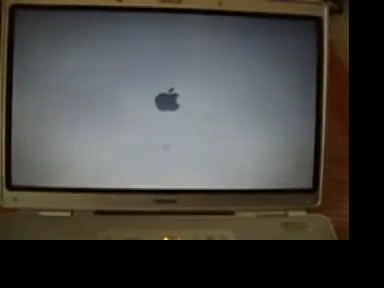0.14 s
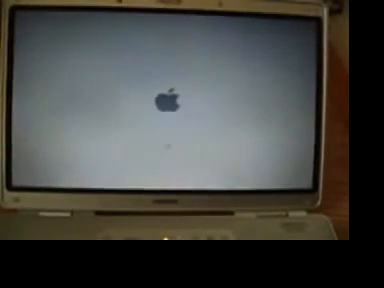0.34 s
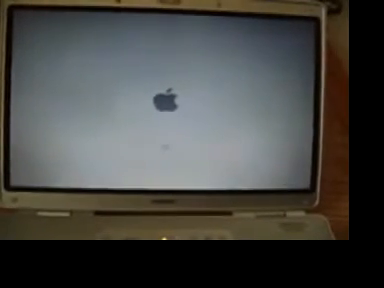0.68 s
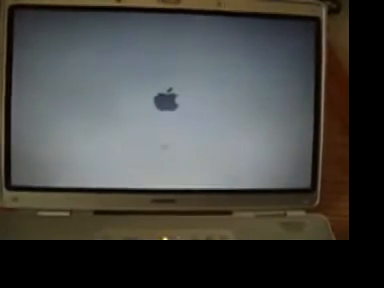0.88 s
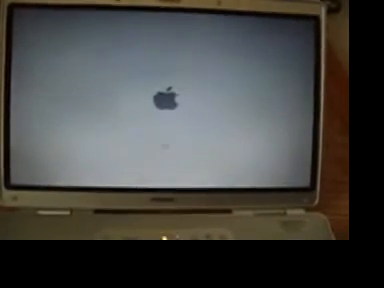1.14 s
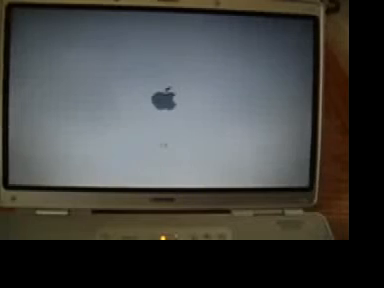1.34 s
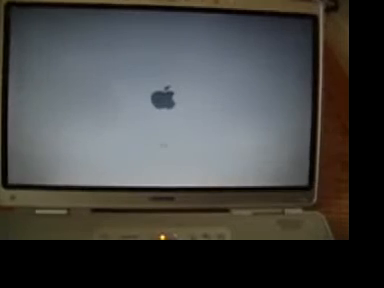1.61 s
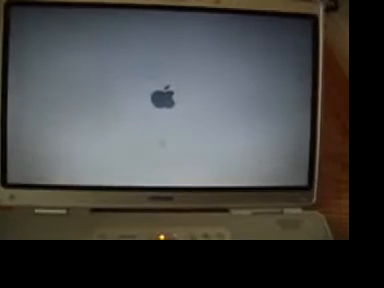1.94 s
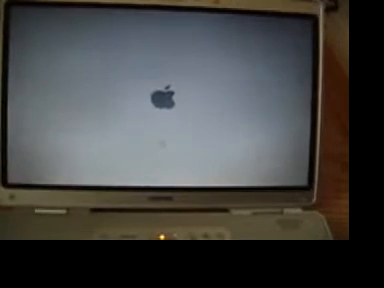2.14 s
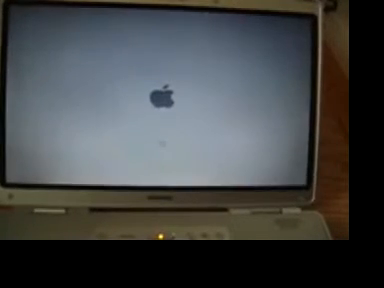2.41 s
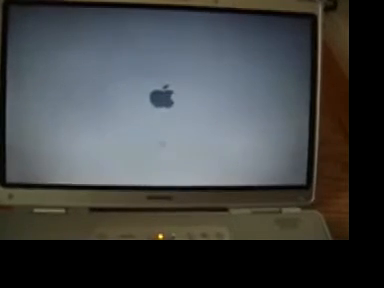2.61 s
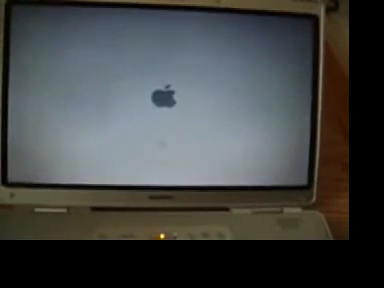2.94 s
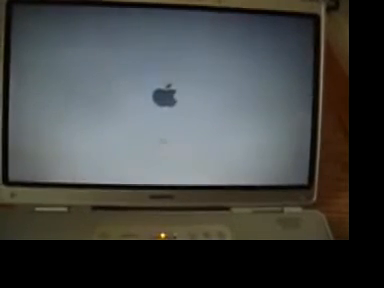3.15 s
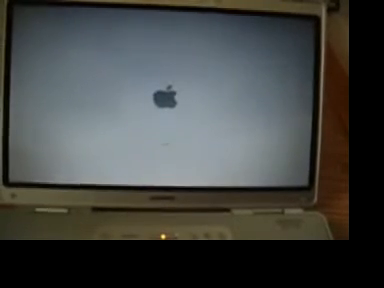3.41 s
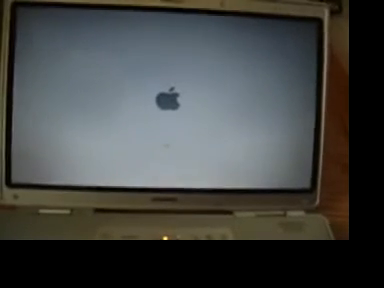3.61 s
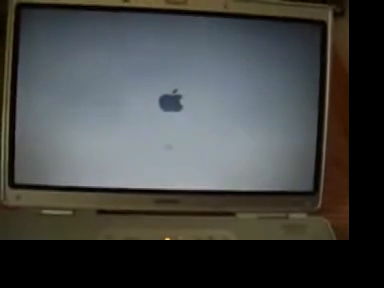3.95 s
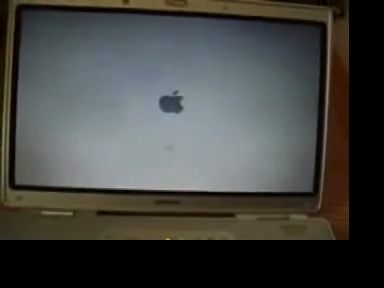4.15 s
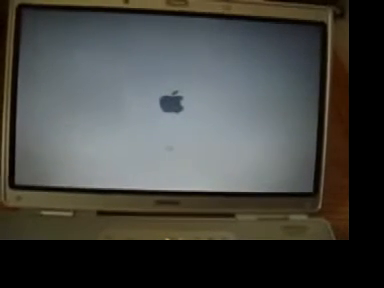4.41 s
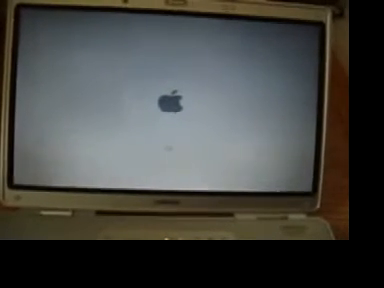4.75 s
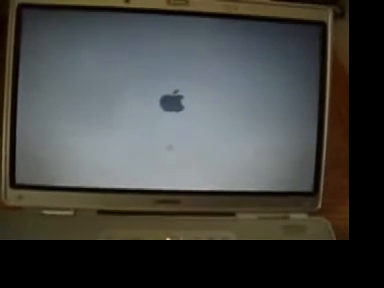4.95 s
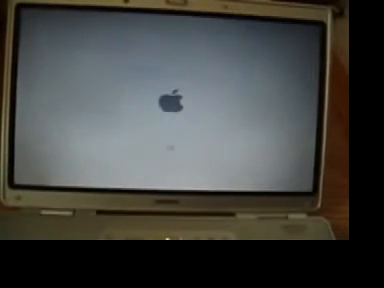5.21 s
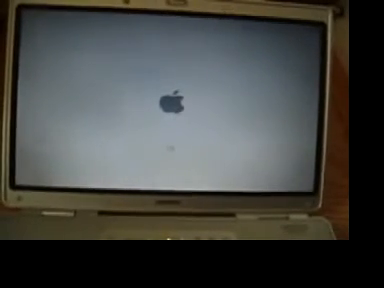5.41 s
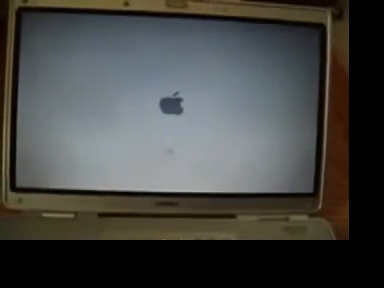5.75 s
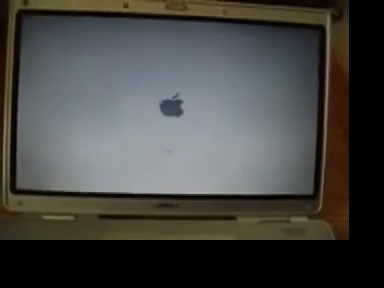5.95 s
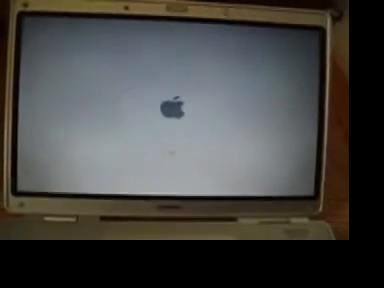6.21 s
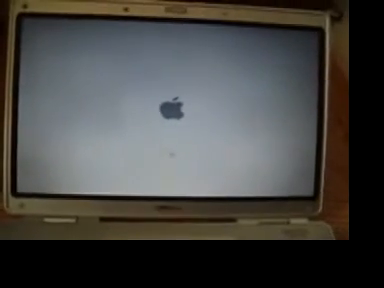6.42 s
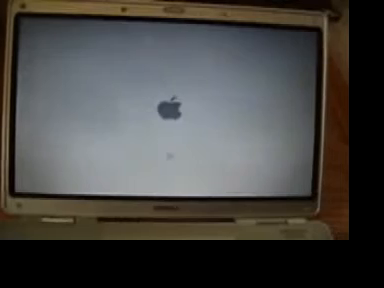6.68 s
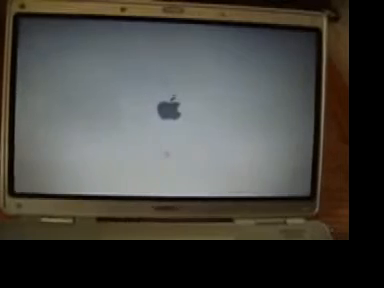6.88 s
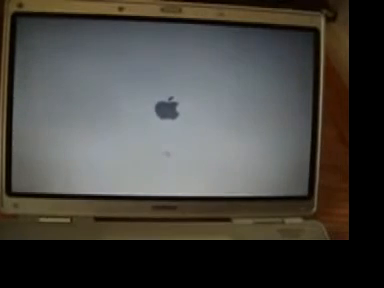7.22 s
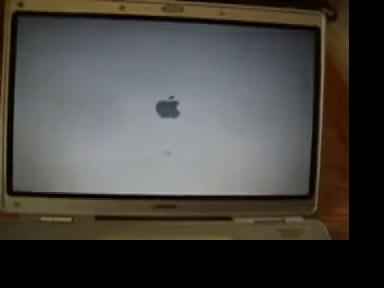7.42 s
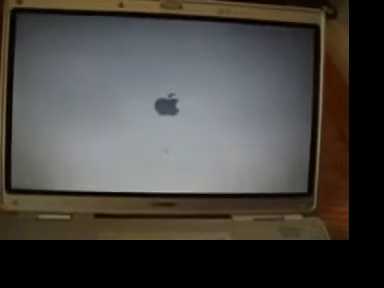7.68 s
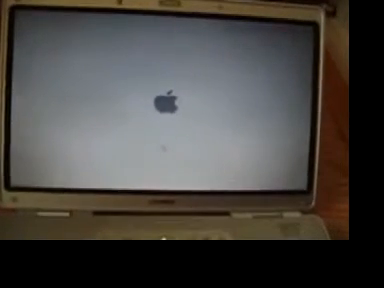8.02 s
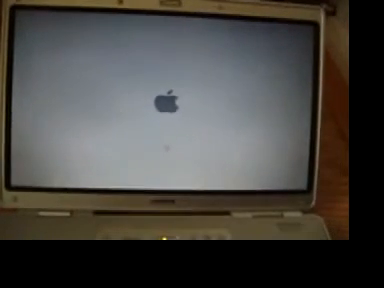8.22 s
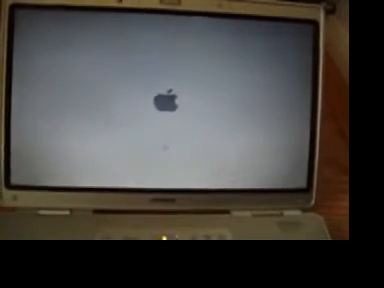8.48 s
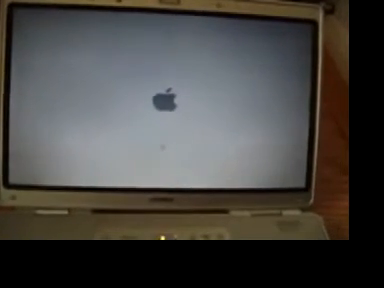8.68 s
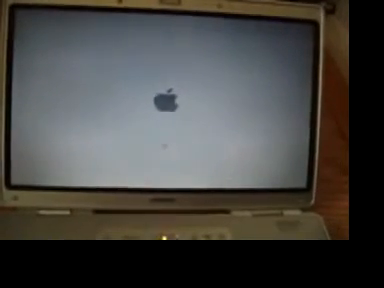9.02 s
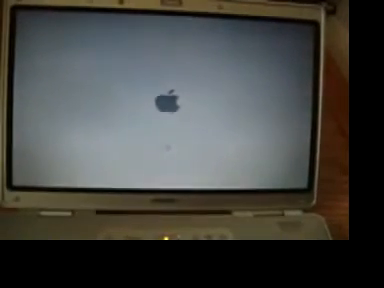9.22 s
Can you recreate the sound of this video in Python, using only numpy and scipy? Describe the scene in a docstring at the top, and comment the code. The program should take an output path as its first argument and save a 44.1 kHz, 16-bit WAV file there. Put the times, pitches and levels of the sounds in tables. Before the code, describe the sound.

Continuous cooling-fan drone, heard close and in mono through a dull, narrow-band microphone with faint hiss. A constant whine around seven hundred hertz dominates a soft airy rush, with low hum and very thin high electric whistles beneath. Apart from a slight early run-up of the smaller fan, nothing changes. Quiet desk bumps appear around five and six and a half seconds, then deep faint thuds and final light plastic ticks.

```python
"""A quiet room: an open laptop idles on a desk, close to the microphone of a small hand-held camera. Two
cooling fans whir as sums of sines locked to their shafts, over a rush of shaped noise. Fixed sines give the
hum, thin electric whistles and two high tones of the small fan held at a steady pitch; low ringing sines give
faint thuds and knocks from the building and desk, and one brief rumble. A few filtered noise ticks come near
the end."""
import sys
import numpy as np
from scipy import signal
from scipy.fft import rfft, irfft
from scipy.io import wavfile
from scipy.ndimage import uniform_filter1d

SR = 44100
rng = np.random.default_rng(int(sys.argv[2]) if len(sys.argv) > 2 else 0)


def log_audio(samples):
    """Write samples as a 16-bit WAV file to the path given in sys.argv[1]."""
    # one column per channel
    frames = np.atleast_2d(samples).T
    # limit to full scale, then quantise
    limited = np.clip(frames, -1, 1)
    pcm = np.round(limited * 32767).astype(np.int16)
    wavfile.write(sys.argv[1], SR, pcm)


N = 412335  # length in samples, about 9.35 s


def gain_of(db):
    """Amplitude factor of a level in dB."""
    return 10 ** (np.asarray(db) / 20)


def evened(x):
    """Scale to an rms of one."""
    return x / np.sqrt(np.mean(x ** 2) + 1e-20)


def add(mix, start_s, sound):
    """Lay a sound into the mix, cut where the mix ends."""
    part = mix[round(start_s * SR):][:len(sound)]
    part += sound[:len(part)]


def wander(fastest_hz, count=24):
    """Slow chance of rms one: sines of random phase, weaker as they get faster."""
    t = np.arange(0, N + 400, 200) / SR  # a coarse grid is enough for such slow motion
    slow = 0
    for hz in np.geomspace(.06, fastest_hz, count):
        slow = slow + np.sin(2 * np.pi * (hz * t + rng.random())) / np.sqrt(hz)
    return np.interp(np.arange(N) / SR, t, evened(slow))


# Rushing air and room rumble, before the fine ripples: (pitch_hz, level_db per Hz)
AIR_COLOUR = [(14, -76), (45, -83.5), (75, -70.5), (140, -73), (220, -69.5), (420, -69), (520, -62),
              (780, -59), (900, -64.5), (1130, -65), (1200, -71.5), (2300, -74.5), (3800, -77), (4800, -81)]
# Fine ripples in the colour of the rush, some of them only chance:
# (pitch_hz, width_hz as two standard deviations, lift_db)
RIPPLES = [(208, 18, 2), (278, 15, 1), (417, 25, -1.5), (528.4, 25, 3.5), (542, 9.4, -5), (560, 20, -2.5),
           (808, 27, -1), (938, 9.1, 4.5), (1180, 28, -1.5), (1190, 20, 4), (1380, 24, 2.5), (1464, 20, -2),
           (1470, 25, 2.5), (1500, 30, -1.5), (1600, 40, -1.5), (1665, 40, 2.5), (1665, 27, -1.5),
           (1830, 19, -1), (1983, 36, -3.5), (2220, 110, 1.5), (2470, 91, -2), (3010, 60, -2.5),
           (3070, 77, 3), (3240, 54, -1), (3800, 150, 0.5), (4000, 160, -2), (4700, 82, 2.5)]


def air(patchy_db=.5, swell_db=0.41):
    """Random short-time spectra with a rippled colour, faint drifting patches and a slow swell."""
    size, hop = 4096, 1024
    frames, hz = N // hop + 5, np.fft.rfftfreq(size, 1 / SR)
    real, imaginary, patches = rng.standard_normal((frames, len(hz), 3)).T
    patches = uniform_filter1d(patches, size=40, axis=0)  # along pitch
    patches = evened(uniform_filter1d(patches, size=4, axis=1))  # along time

    colour_hz, level_db = np.transpose(AIR_COLOUR)
    colour_db = np.interp(np.log(hz + 1), np.log(colour_hz), level_db)
    for centre_hz, width_hz, lift_db in RIPPLES:
        colour_db = colour_db + lift_db * np.exp(-2 * ((hz - centre_hz) / width_hz) ** 2)

    swell = np.resize(wander(3.4)[::hop], frames)
    white = (real + 1j * imaginary) * gain_of(patchy_db * patches + swell_db * swell)
    overlap = size - hop
    white_rms = signal.istft(white, nperseg=size, noverlap=overlap)[1].std()
    scale = np.sqrt(SR / 2) / white_rms  # makes white noise 0 dB per Hz
    rush = signal.istft(white * gain_of(colour_db)[:, None], nperseg=size, noverlap=overlap)[1]
    return scale * rush[:N]


def low_note(pitch_hz, level_db, rise_s, t60_s):
    """Swells softly to its peak level and rings down on one pitch, for one second at most."""
    t = np.arange(SR) / SR
    swell = np.sin(np.pi / 2 * np.minimum(t / rise_s, 1)) ** 2
    ring = gain_of(level_db - 60 * np.maximum(t - rise_s, 0) / t60_s)
    return swell * ring * np.sin(2 * np.pi * pitch_hz * t)


def rumble():
    """One brief low rumble passes: a single slow-rising low note."""
    out = np.zeros(N)
    add(out, 3.4, low_note(pitch_hz=31, level_db=-46, rise_s=.14, t60_s=.5))
    return out


# Heavy thuds somewhere in the building: (start_s, level_db as the peak of a 0 dB floor mode)
THUD_TIMES = [(6.37, -46), (7.79, -46), (8.48, -44.5)]
# What the floor rings with: (pitch_hz, level_db relative to the thud, t60_s)
FLOOR_RINGS = [(18, 0, 1.9), (30, -2, .7)]


def thuds():
    """Each distant thud rings all the floor modes together."""
    out = np.zeros(N)
    for start_s, level_db in THUD_TIMES:
        for pitch_hz, mode_db, t60_s in FLOOR_RINGS:
            add(out, start_s, low_note(pitch_hz, level_db + mode_db, .045, t60_s))
    return out


# Dull knocks through the desk: (start_s, pitch_hz, level_db at the peak)
DESK_KNOCKS = [(4.82, 105, -41), (4.93, 110, -44), (5.01, 122, -38), (5.11, 108, -35), (5.175, 120, -38),
               (6.365, 80, -35), (6.44, 84, -45), (6.5, 80, -43), (6.575, 115, -41)]


def knocks():
    """Each knock swells and rings down on its own note, in a set number of its own cycles."""
    rise_cycles, t60_cycles = 1.4, 24
    out = np.zeros(N)
    for start_s, pitch_hz, level_db in DESK_KNOCKS:
        add(out, start_s, low_note(pitch_hz, level_db, rise_cycles / pitch_hz, t60_cycles / pitch_hz))
    return out


# Small plastic ticks: (start_s, level_db as rms before the decay)
PLASTIC_TICKS = [(9.194, -40), (9.229, -42), (9.258, -45), (9.3, -47)]


def ticks():
    """Short bright bursts: band-limited noise under a steep decay."""
    t60_s = .25
    out, t = np.zeros(N), np.arange(SR // 5) / SR
    band = signal.butter(2, [2400, 4700], "bandpass", fs=SR, output="sos")
    noises = rng.standard_normal((len(PLASTIC_TICKS), len(t)))
    for (start_s, level_db), noise in zip(PLASTIC_TICKS, noises):
        burst = evened(signal.sosfilt(band, noise))
        add(out, start_s, burst * gain_of(level_db - 60 * t / t60_s))
    return out


# Supply hums and thin whistles, among them two high tones of the small fan held at a fixed pitch (3690.9,
# 3769.7): pitch_hz of each
WHISTLE_HZ = [99.6, 184.4, 199.9, 2771.1, 2835.7, 3631.0, 3645.8, 3660.6, 3690.9, 3718.5, 3769.7, 4005.2,
              4094.7, 4159.3]
# The same tones in the same order: level_db (rms, before flutter)
WHISTLE_DB = [-57.5, -56.5, -60.5, -62.5, -66.5, -69, -65, -54, -69, -66, -68, -72, -63.5, -70.5]


def whistles():
    """Supply hum below, coil and bearing whistles above: fixed pitches with a slight level flutter."""
    t = np.arange(N) / SR
    out = np.zeros(N)
    for pitch_hz, level_db in zip(WHISTLE_HZ, WHISTLE_DB):
        level = np.sqrt(2) * gain_of(level_db + .6 * wander(4.0))
        out += level * np.sin(2 * np.pi * (pitch_hz * t + rng.random()))
    return out


def fan(shaft_hz, tones, drift=6e-5, flutter_db=0.98):
    """All tones ride one shaft whose speed barely drifts; each flutters a little in the stirred air."""
    turns = np.cumsum(shaft_hz * (1 + drift * wander(1.5))) / SR
    out = np.zeros(N)
    for multiple, level_db in tones:
        level = np.sqrt(2) * gain_of(level_db + flutter_db * wander(7.3))
        out += level * np.sin(2 * np.pi * (round(multiple) * turns + rng.random()))
    return out


# Run-up of the small fan: (start_s, shaft_hz in turns a second, level_db relative to full speed)
SMALL_FAN_RUN = [(0, 78.0, -6), (.7, 78.2, -6), (1.05, 78.62, 0), (2.2, 78.61, 0), (3.2, 78.53, 0),
                 (9.4, 78.535, 0)]
# Tones of the small fan: (multiple of the shaft speed, level_db as rms at full speed, before flutter)
SMALL_FAN_TONES = [(1, -59), (2, -62.5), (5, -66), (6, -53.5), (7, -54.5), (8, -42.5), (9, -58.5),
                   (10, -54), (11, -55.5), (12, -56.5), (16, -67), (24, -67)]


def small_fan():
    """Still coming up to speed at first: it overshoots a little, then holds."""
    start_s, shaft_hz, level_db = np.transpose(SMALL_FAN_RUN)
    t = np.arange(N) / SR
    return gain_of(np.interp(t, start_s, level_db)) * fan(np.interp(t, start_s, shaft_hz), SMALL_FAN_TONES)


# Tones of the big fan, its 13 blades loudest: (multiple of the shaft speed, level_db rms before flutter)
BIG_FAN_TONES = [(1, -75), (7, -58), (8, -57.5), (10, -56), (11, -52.5), (13, -31), (14, -51), (15, -47.5),
                 (16, -51), (24, -53.5), (26, -53.5), (39, -59.5), (52, -65.5), (65, -67.5), (67, -66.5)]


def big_fan():
    """A steady shaft carries the strong blade tone and its weaker neighbours."""
    return fan(55.124, BIG_FAN_TONES)  # shaft turns a second


def scene():
    """The laptop in its room, from the background to the fans, as one channel."""
    background = air() + rumble() + thuds() + knocks() + ticks() + whistles()
    return (background + small_fan() + big_fan())[None]


def record(dry):
    """A narrow-band microphone path, with a faint broadband hiss, stronger where the wave is steep."""
    hz = np.fft.rfftfreq(dry.shape[1], 1 / SR)
    treble_db = np.maximum(-30 * (np.maximum(hz - 4700, 0) / 900) ** 1.95, -80)
    narrow = irfft(rfft(dry) * gain_of(treble_db), dry.shape[1])

    slope = np.gradient(narrow, axis=1)
    steep = evened(np.sqrt(abs(uniform_filter1d(slope ** 2, size=9))))
    hiss_level = (steep + .15) ** 1.12
    hiss = gain_of(-65.5) * evened(hiss_level * rng.standard_normal(dry.shape))

    edge_hz, resting_level = 15720, -.0038  # upper limit of the sound, and its constant offset
    edge = signal.firwin(1023, edge_hz, window=("kaiser", 9), fs=SR)
    return signal.oaconvolve(narrow + hiss, edge[None], "same") + resting_level


dry = scene()
out = record(dry)
log_audio(out)
```